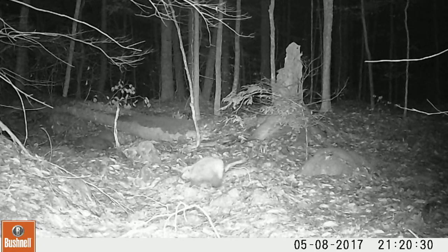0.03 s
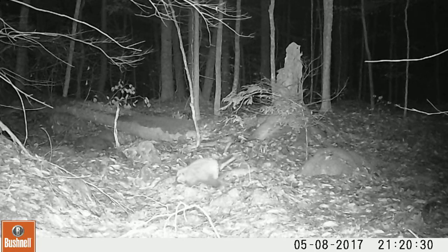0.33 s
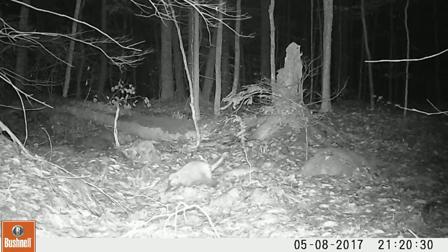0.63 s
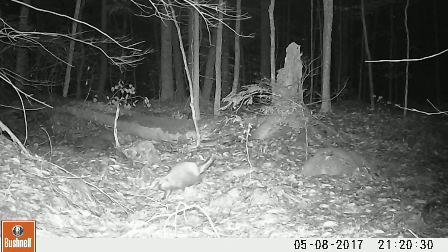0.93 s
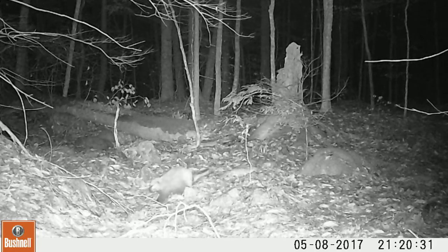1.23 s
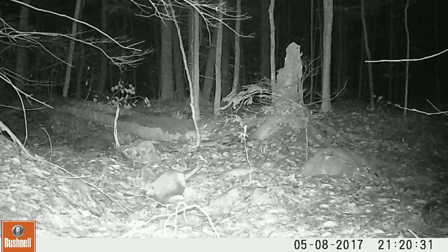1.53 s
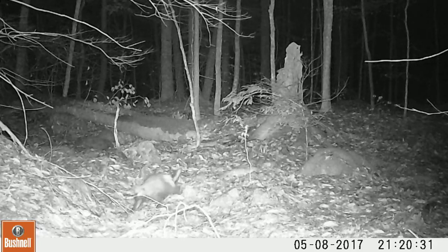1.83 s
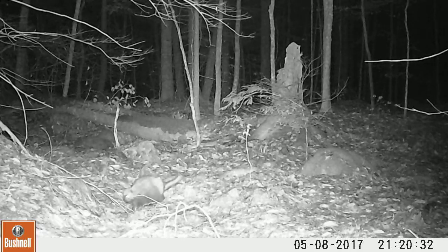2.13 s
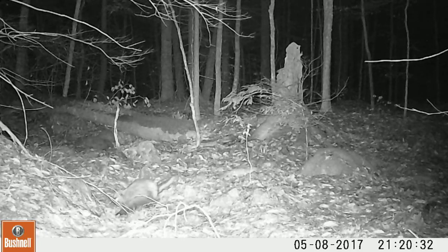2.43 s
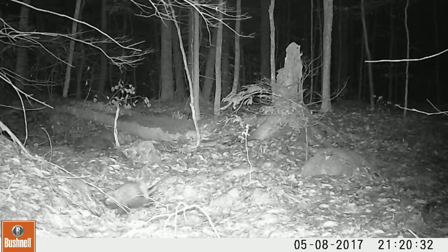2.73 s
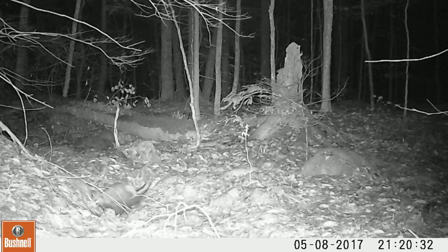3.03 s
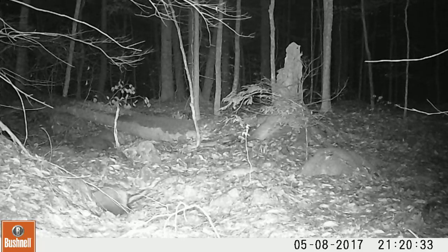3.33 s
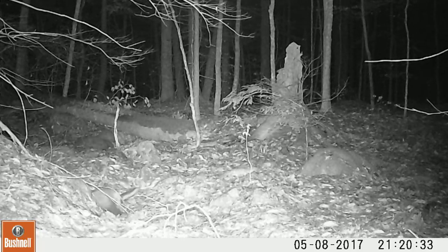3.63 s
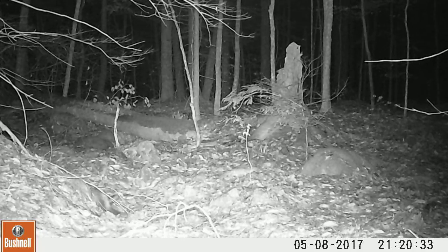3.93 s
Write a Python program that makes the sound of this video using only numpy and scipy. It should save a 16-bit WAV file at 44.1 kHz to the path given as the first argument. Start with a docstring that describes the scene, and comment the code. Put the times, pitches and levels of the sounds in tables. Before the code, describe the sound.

A trail camera's own noise, a steady hiss and low buzz with soft thumps five times a second, fills a still night forest. Beneath it a small animal faintly rustles dry leaves, with one clear twig tick early on.

```python
"""A still forest at night, heard through a trail camera whose own noise is the main sound.
Five times a second it writes to memory, and the current it draws makes a soft thump and a faint whine.
Its power supply buzzes low at the frame rate, and its microphone hisses through a narrow resonance.
Under all this a small animal walks off over dry leaves: a few faint rustles, one clear twig tick
and two much softer ones."""
import sys
import numpy as np
from scipy.fft import rfft, irfft, next_fast_len
from scipy.io import wavfile
from scipy.ndimage import map_coordinates

SR = 44100
rng = np.random.default_rng(int(sys.argv[2]) if len(sys.argv) > 2 else 0)


def to_wav(s):
    """Save 16-bit WAV."""
    ch = np.atleast_2d(s).T  # columns
    pcm = np.round(np.clip(ch, -1, 1) * 32767)  # PCM
    wavfile.write(sys.argv[1], SR, pcm.astype(np.int16))


N = 4 * SR


def memory_writes():
    """Each write to memory draws current twice, which thumps; it also whines, rumbles and chatters."""
    # The two pulses of current in a write: delay_s, length_s, scatter_s
    pulses = [(0, 0.02686, 0.0011), (0.041, .009, .004)]
    # Tone of the low rumble: pitch_hz, relative_db
    rumble_shape = [(15, -2), (35, -0.5), (70, -7.5), (130, -15), (250, -26), (1000, -120)]
    # Tone of the brighter chatter: pitch_hz, relative_db
    chatter_shape = [(40, 1), (120, -4), (300, -6.5), (600, -19), (1200, -21.5), (2500, -33), (6000, -63.5)]
    first_s, every_s = 0.078, 0.2
    thump_low_hz, thump_high_hz, whine_hz = 16, 57, 596
    t = np.arange(N) / SR
    starts = np.arange(first_s, N / SR, every_s)
    current = np.zeros(N)
    for delay_s, length_s, scatter_s in pulses:
        pulse_starts = starts + delay_s + scatter_s * rng.standard_normal(len(starts))
        current += gate(pulse_starts, length_s, edge_s=0.0024)
    # Keeping mostly the deep bass turns each pulse into a thump.
    bass_band = lambda hz: 1j * hz / (thump_low_hz + 1j * hz) / (1 + 1j * hz / thump_high_hz)
    thump = filtered(current, bass_band)
    whine = unit(np.sin(2 * np.pi * whine_hz * t + 0.99 * wobble(per_s=90)))
    rumble = coloured(rng.standard_normal(N), rumble_shape)
    chatter = coloured(rng.standard_normal(N), chatter_shape)
    return (amp(-35) * thump
            + amp(-70.5) * whine * gate(starts, length_s=0.046, edge_s=0.0036)
            + amp(-55) * rumble * gate(starts, length_s=0.098, edge_s=0.012)
            + amp(-63) * chatter * gate(starts + 0.015, length_s=0.043, edge_s=0.029))


def frame_buzz():
    """The power supply ripples at the frame rate, with a row of overtones that waver a little in level."""
    # Overtones of the ripple: pitch_hz, relative_db
    overtones = [(40, -57.5), (60, -65.5), (80, -66), (100, -64.5), (120, -63.5), (140, -65), (160, -74),
                 (180, -72), (200, -78), (220, -87), (260, -81), (280, -77.5), (300, -88), (320, -81),
                 (340, -81), (380, -92), (440, -96), (480, -91)]
    frame_hz, first_frame_s = 20, 0.0024
    delay_s, smear_s_per_hz = 0.024, 0.00036  # higher overtones arrive later in each frame
    t = np.arange(N) / SR - first_frame_s
    ripple = np.sin(2 * np.pi * frame_hz * t)
    buzz = np.zeros(N)
    for pitch_hz, relative_db in overtones:
        delayed_t = t - delay_s - smear_s_per_hz * pitch_hz
        waver_db = 0.8 * wobble(per_s=6)
        buzz += amp(relative_db + waver_db) * np.sin(2 * np.pi * pitch_hz * delayed_t)
    return np.sqrt(2) * (amp(-38.5) * ripple + amp(1.5) * buzz)


def microphone_hiss():
    """The microphone hisses steadily, strongest near 3200 Hz, where its small opening resonates."""
    # Tone of the hiss: pitch_hz, relative_db
    hiss_shape = [(30, -17), (150, -3.5), (300, -7.5), (500, -8.5), (900, -12), (1700, -14.5),
                  (2300, -12.5), (2750, -7), (3180, 0.5), (3550, -7), (4000, -14.5), (4700, -21),
                  (6800, -23), (7700, -28), (8300, -36.5), (8750, -48)]
    return amp(-62) * coloured(rng.standard_normal(N), hiss_shape)


def footsteps():
    """Each step presses tiny crackles out of dry leaves; the heaviest also crushes the litter below."""
    # One rustle a row: middle_s, half_length_s, level_db
    steps = [(.107, 0.0044, -63), (0.088, .09, -79), (0.524, .022, -70), (0.978, 0.14, -75),
             (1.08, 0.062, -72), (1.895, 0.058, -76.5), (3.36, .015, -77)]
    # Tone of the dry leaves on top: pitch_hz, relative_db
    leaf_shape = [(1000, -27.5), (2400, -10), (3300, 6), (4300, -6), (5300, -9.5), (6600, 0), (7500, -9.5),
                  (8600, -25)]
    # Tone of the leaf litter below: pitch_hz, relative_db
    litter_shape = [(1500, -37), (2600, -16), (3200, 4.5), (3700, -8), (4500, -22.5), (8000, -38)]
    crackles_per_s = 900
    t = np.arange(N) / SR

    def crackles():
        return (rng.random(N) < crackles_per_s / SR) * rng.standard_normal(N)

    def press(middle_s, half_length_s, level_db):
        return amp(level_db) * np.exp(-2 * ((t - middle_s) / half_length_s) ** 2)

    rustle = sum(press(*step) for step in steps) * coloured(crackles(), leaf_shape)
    crunch = press(middle_s=1.108, half_length_s=0.1, level_db=-64) * coloured(crackles(), litter_shape)
    return rustle + crunch


def twig_ticks():
    """Thin twigs tick underfoot and ring for a few milliseconds."""
    # One tick a row: start_s, level_db
    ticks = [(.1325, -46), (1.0295, -31), (1.166, -46)]
    # The tones a twig rings with: pitch_hz, relative_db, ring_s (time to fade by 60 dB)
    tones = [(3330, -4.5, .008), (3580, -2.5, 0.0056), (3930, -16, 0.0046), (7100, -22, 0.0057)]
    rise_s = 0.00057
    t = np.arange(SR // 20) / SR
    ring = sum(amp(relative_db - 60 * t / ring_s) * np.sin(2 * np.pi * pitch_hz * t)
               for pitch_hz, relative_db, ring_s in tones)
    rise = 1 - np.exp(-(t / rise_s) ** 2)
    out = np.zeros(N + SR)
    for start_s, level_db in ticks:
        out[round(start_s * SR):][:len(t)] += amp(level_db) * ring * rise
    return out[:N]


def amp(db):
    """Turn decibels into a number to multiply by."""
    return 10 ** (np.asarray(db) / 20)


def unit(x):
    """Scale a sound to an average (rms) level of 1."""
    return x / np.sqrt(np.mean(x ** 2) + 1e-20)


def filtered(x, response):
    """Multiply each frequency in a sound by response(hz)."""
    size = next_fast_len(N + SR // 2)
    hz = np.fft.rfftfreq(size, 1 / SR)
    return irfft(rfft(x, size) * response(hz), size)[..., :N]


def coloured(x, shape):
    """Give a sound the tone drawn by (pitch_hz, relative_db) points, at an average level of 1."""
    pitch_hz, relative_db = np.transpose(shape)
    curve = lambda hz: amp(np.interp(np.log(hz + 1), np.log(pitch_hz + 1), relative_db))
    return unit(filtered(x, curve))


def wobble(per_s):
    """A smooth curve through per_s random values a second."""
    values = rng.standard_normal(int(N * per_s / SR) + 4)
    return map_coordinates(values, [np.arange(N) * per_s / SR])


def gate(starts, length_s, edge_s):
    """Switch on for length_s after each start, fading in and out over edge_s."""
    t = np.arange(N) / SR
    ramp = lambda since_s: np.clip(since_s / edge_s + 0.5, 0, 1)
    return sum(ramp(t - start_s) - ramp(t - start_s - length_s) for start_s in starts)


def scene():
    """The camera's own noise with the animal faint under it, in one channel."""
    camera = microphone_hiss() + frame_buzz() + memory_writes()
    animal = footsteps() + twig_ticks()
    return (camera + animal)[None]


def record(dry):
    """The camera cuts off the highest treble sharply."""
    top_hz = 8700
    return filtered(dry, lambda hz: 1 / (1 + (hz / top_hz) ** 80))


dry = scene()
out = record(dry)
to_wav(out)
```